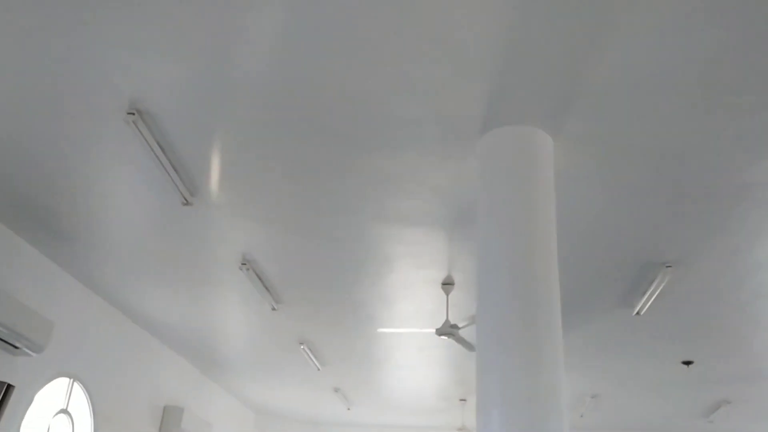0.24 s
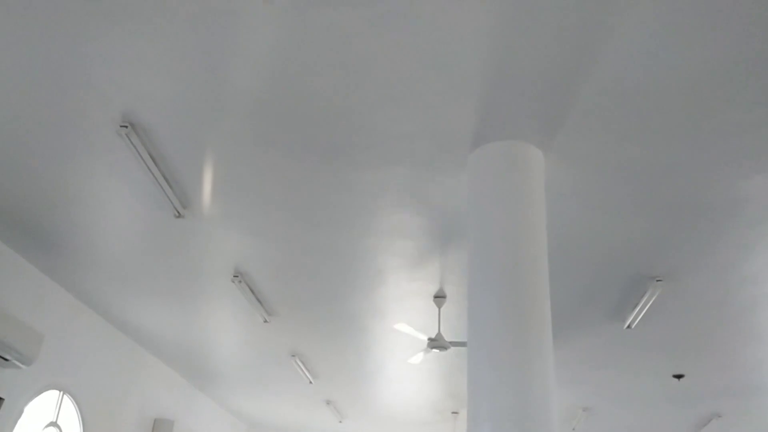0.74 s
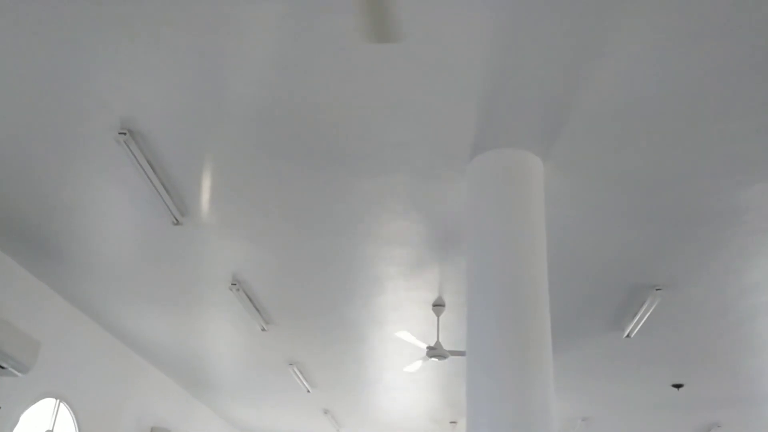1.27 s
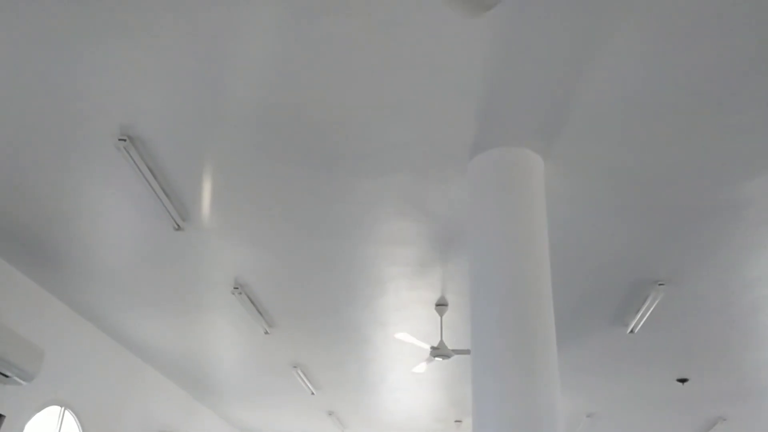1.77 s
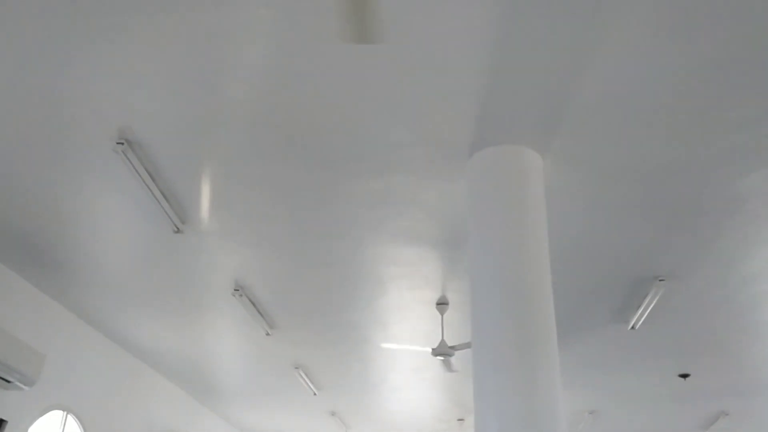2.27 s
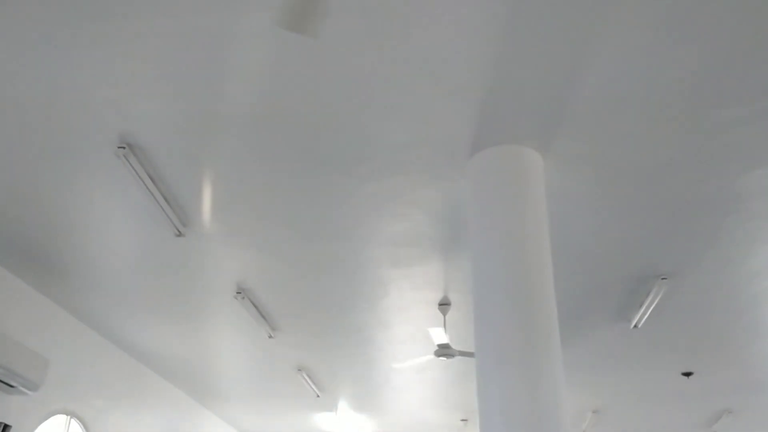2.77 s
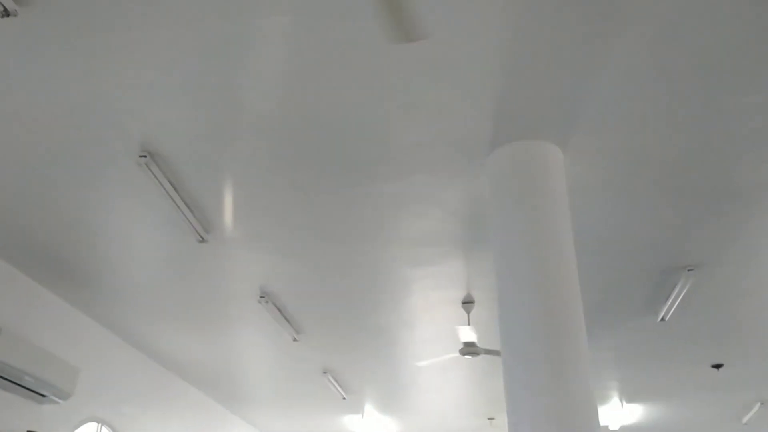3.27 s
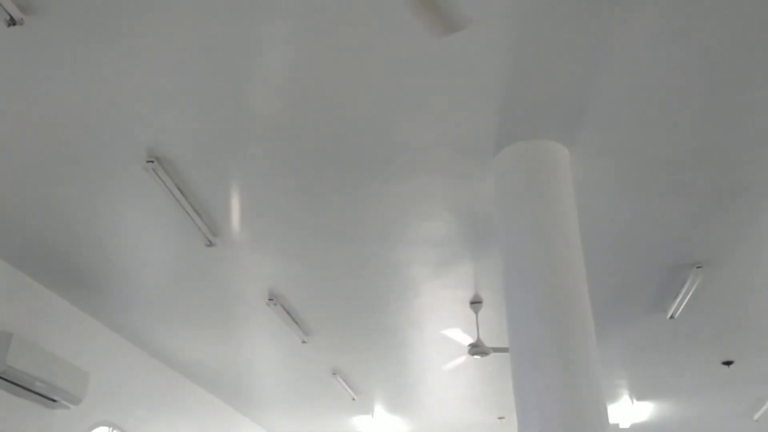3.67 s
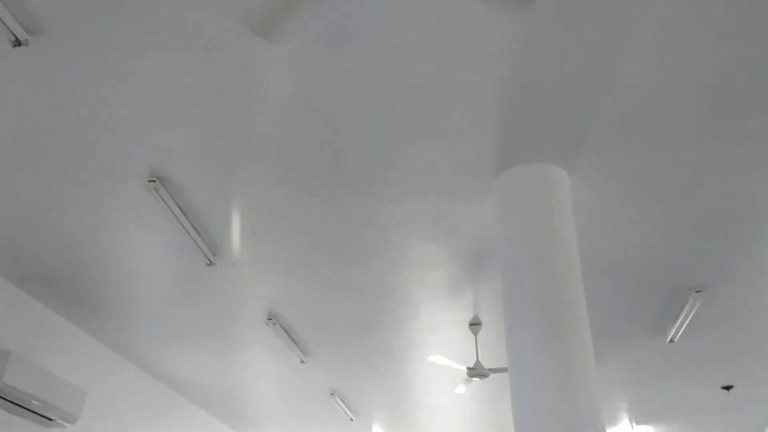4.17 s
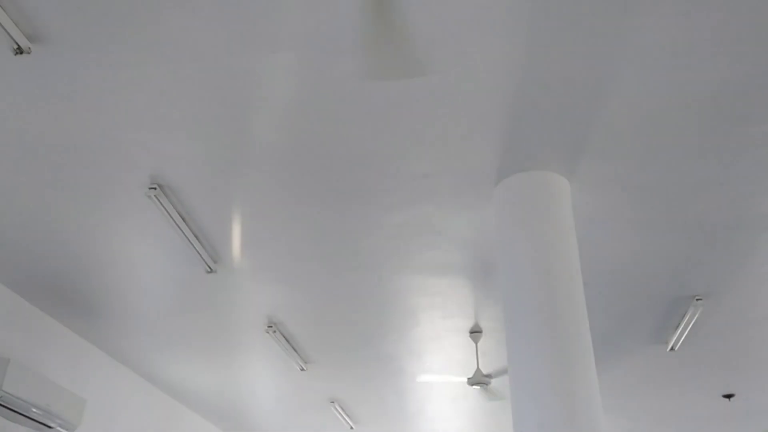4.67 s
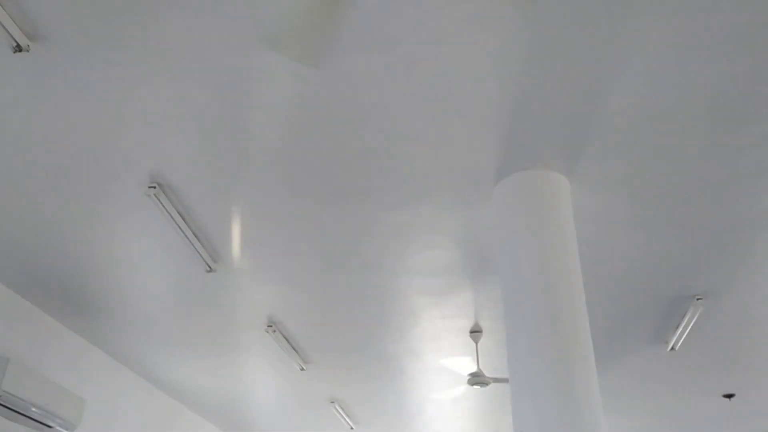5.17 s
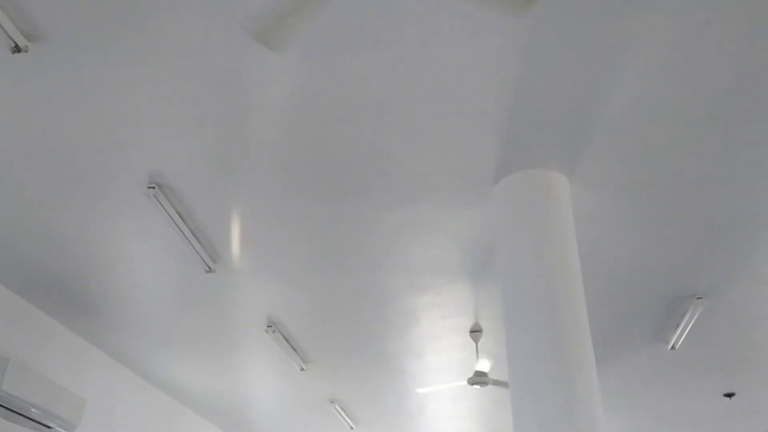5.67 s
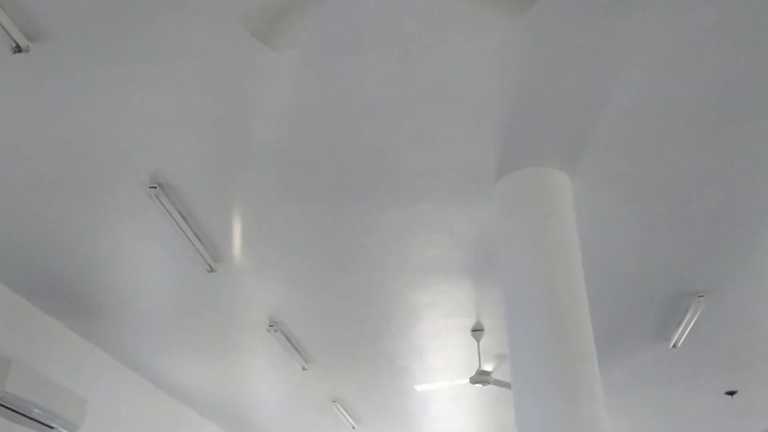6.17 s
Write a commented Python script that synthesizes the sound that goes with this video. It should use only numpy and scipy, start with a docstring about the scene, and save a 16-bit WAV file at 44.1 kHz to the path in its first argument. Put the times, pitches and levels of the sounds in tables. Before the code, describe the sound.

Sharp, hard clicks crack out close by at uneven intervals, each ringing briefly through a bare hall while ceiling fans rush softly and gradually louder.

```python
"""Sharp clicks of a small hard object close by stand out from the growing rush of ceiling fans in a bare hall.
Each click is a gritty contact that rings a shell and a hollow body; a surface nearby, the ceiling and the
far wall answer, and the hall rings on. Two short noise bursts tick faintly, and fluttering tones squeak far
away. Shaped noise makes the fans' rumble and rush, their wavering motor hum, a low hum and a thin hiss.
A microphone with two ports, left and right, picks it all up."""
import sys
import numpy as np
from scipy import signal
from scipy.fft import rfft, irfft, next_fast_len
from scipy.io import wavfile
from scipy.ndimage import uniform_filter1d, map_coordinates

SR = 44100
rng = np.random.default_rng(int(sys.argv[2]) if len(sys.argv) > 2 else 0)


def to_wav(sig):
    """Store sig (one row per channel, or 1-D mono) as 16-bit WAV at the path in sys.argv[1].

    Samples outside -1..1 are clipped; the rate is SR.
    """
    pcm = np.clip(np.atleast_2d(sig), -1, 1) * 32767
    pcm = np.round(pcm).astype(np.int16)
    wavfile.write(sys.argv[1], SR, pcm.T)  # frames by channels


N = 283122  # length of the scene in samples


def amp(db):
    """Turns a level in dB into a gain."""
    return 10 ** (np.asarray(db) / 20)


def unit(x):
    """Scales x to an average strength (rms) of 1."""
    return x / np.sqrt(np.mean(x ** 2) + 1e-20)


def along(points, hz, axis=1):
    """Reads one column of a table between its rows, on a logarithmic frequency axis."""
    columns = np.transpose(points)
    return np.interp(np.log(hz + 1), np.log(columns[0] + 1), columns[axis])


def wobble(rate):
    """A smooth random curve through `rate` random points a second."""
    knots = rng.standard_normal(int(N * rate / SR) + 4)
    return map_coordinates(knots, [np.arange(N) * rate / SR])


def filtered(x, response):
    """Shapes x by a (possibly complex) response to each frequency."""
    n = x.shape[-1]
    padded = next_fast_len(n + 8192)
    spectrum = rfft(x, padded) * response(np.fft.rfftfreq(padded, 1 / SR))
    return irfft(spectrum, padded)[..., :n]


def modes(table, f):
    """Resonances that ring after a blow; rows are (frequency [Hz], width [Hz], level [dB]), signs alternate."""
    return sum((-1) ** k * amp(db) * 1j * f * width / (centre ** 2 - f * f + 1j * f * width)
               for k, (centre, width, db) in enumerate(table))


def bumps(table, f):
    """Smooth bell-shaped bands added up; rows are (frequency [Hz], width [Hz], level [dB])."""
    return sum(amp(db) * np.exp(-((f - centre) / width) ** 2) for centre, width, db in table)


def add(out, s, x):
    """Mixes x into out at s seconds; what falls outside is lost."""
    start = round(s * SR)
    x = x[:, max(-start, 0):N - start]
    out[:, max(start, 0):max(start, 0) + x.shape[1]] += x


def burst(shape, evenness):
    """Two bursts of noise under an envelope, energy 1; evenness 0-1 flattens chance peaks in the spectrum."""
    z = rfft(rng.standard_normal((2, len(shape))) * shape)
    size = np.abs(z)
    even = z / (size + .2 * size.mean()) ** np.clip(evenness, 0, 1)
    x = irfft(even, len(shape)) * np.sqrt(shape)
    return x / np.linalg.norm(x, axis=1, keepdims=True)


def ports(hz):
    """Gains of the two microphone ports for diffuse sound; a cavity resonance favours the left one."""
    # (frequency [Hz], left minus right [dB])
    lean = [(60, 3), (110, 0.5), (200, 1.0), (380, 0.5), (700, 0), (1290, 2), (2380, 9), (4400, 1.5),
            (8120, 2.5), (15000, 1)]
    return amp(np.outer([.5, -.5], along(lean, hz)))


def diffuse(gain, patchy_db):
    """Noise from all around, rms 1, with random patches in pitch and time; the ports share the bass most."""
    # how alike left and right are: (frequency [Hz], likeness [0-1])
    alike = [(30, .85), (60, .9), (130, .95), (290, .9), (640, .72), (1410, .34), (3100, .03), (15000, 0)]
    air_lag = 4 / SR  # seconds by which the left port hears the air later
    z = signal.stft(rng.standard_normal((2, N)), nperseg=512)[2]
    field = uniform_filter1d(rng.standard_normal(z.shape[1:]), size=6, axis=0)
    field = uniform_filter1d(field, size=12, axis=1)
    pair = signal.istft(z * amp(patchy_db * unit(field)), nperseg=512)[1][:, :N]

    def split(hz):
        turn = np.arccos(np.clip(along(alike, hz), -1, 1)) / 2
        return gain(hz) * [np.cos(turn), np.sin(turn)]

    def late(hz):
        return ports(hz) * np.exp(-2j * np.pi * np.outer([air_lag, 0], hz))

    mid, side = filtered(pair, split)
    return unit(filtered(np.array([mid + side, mid - side]), late))


def hall():
    """Reverberation of energy 1 a port: quick scatter from near walls, then a build-up as the far wall answers."""
    # (frequency [Hz], time to fade by 60 dB [s], starting level [dB])
    fading = [(500, .8, -9.5), (1200, 0.57, 1.5), (2310, 1.9, -3.5), (3360, 1.2, 3.5), (4820, 1.49, -2),
              (6310, 0.83, -7), (7200, 1.1, 0), (9000, 0.91, -1.5), (11800, 0.31, 10.5),
              (11300, 0.25, -3.5), (15000, 0.54, -4)]
    far_wall_s, far_wall_gain = 0.11, .3  # when the far wall's answer peaks, and how far it stands out
    hz, t, z = signal.stft(rng.standard_normal((2, 5 * SR // 4)), SR, nperseg=256)
    level_db = along(fading, hz, axis=2)[:, None] - 60 * t / along(fading, hz)[:, None]
    tail = signal.istft(z * amp(level_db), SR, nperseg=256)[1]
    t = np.arange(tail.shape[1]) / SR
    near = 3 * np.exp(-t / 0.034) * np.clip((t - .007) / 0.001, 0, 1)
    far = np.clip(t / far_wall_s, 0, 1) ** 2 + far_wall_gain * np.exp(-((t - far_wall_s) / 0.022) ** 2)
    tail = filtered(tail * (near + far), ports)
    return tail / np.linalg.norm(tail) * np.sqrt(2)


def clicks():
    """A short gritty contact rings the thin shell and the hollow body; the right port hears it first."""
    # one row a click: (time [s], strength [dB], direct path [dB], contact scale [ms], ring [Hz], ring [dB],
    # tilt [dB per octave], body [dB], thump [dB], left minus right [dB])
    strikes = [(-.03, 11, 1.5, .52, 8000, -2, -0.5, 3.5, 13, 5),
               (0.5964, 11.5, -6.5, 1.83, 8130, 6, 1.3, 2.5, 4, -2),
               (1.064, 12.5, -2, 0.82, 7350, 8.5, 0, 1.5, 10, -2.5),
               (1.9847, 14, -3, 0.74, 6200, -1.5, -.3, 6.5, 13, -2.5),
               (3.986, 13, -3.5, 0.63, 5750, -3.5, 3.5, 6.5, 7, 0.1),
               (4.5609, 11.5, -1.5, 0.81, 7200, 10, 5.8, 4, 3, 2.5),
               (6.33, 14.5, -3, 1, 5160, 5, 0.5, 4.5, 7.5, 1)]
    # resonances of the thin shell: (frequency [Hz], width [Hz], level before the tilt [dB])
    shell_modes = [(4060, 1900, -6.5), (5260, 610, -1), (6200, 2700, -4.5), (7650, 1200, -1),
                   (8850, 960, 1.5), (10160, 3200, -6), (13040, 4500, -14.5)]
    # resonances of the hollow body: (frequency [Hz], width [Hz], level before the body column [dB])
    body_modes = [(1108, 160, -10), (1730, 430, -17), (2036, 180, -9.5), (2300, 180, -3.5),
                  (2602, 360, -3.5), (2815, 640, -15)]
    # the surface under the object: (frequency [Hz], width [Hz], level before the thump column [dB])
    thump_modes = [(462.5, 160, -21.5), (794, 240, -20)]
    # reflections: (delay after the contact's peak [ms], spread before the contact adds to it [ms],
    # left [dB], right [dB]), the levels before walls_db
    mirrors = [(1.727, 0.96, -13.5, -13), (5, 0.76, -12, -9), (7.1, 3.5, -21.5, -28),
               (13.9, 0.86, -31, -28.5), (23.7, 2.1, -25, -31), (30.82, 2.2, -24, -41.5)]
    # ringing of the left port under direct sound: (frequency [Hz], width [Hz], level [dB])
    cavity = [(2180, 200, 0.5)]
    # what the direct path favours over the room: (frequency [Hz], width [Hz], level [dB])
    beam = [(4302, 1100, -3), (7800, 330, 7), (13000, 6700, 4)]
    lag, body_late = 7.5 / SR, .0008  # seconds: left port's delay; until the blow reaches the body
    tilt_hz, ring_width_hz = 7000, 580  # pitch the colour tilts about; width of the strongest ringing band
    walls_db, hall_db = 5.5, -8.5  # reflections and reverberation against the strength of a click
    room_ring_db = -6  # the ringing band points at the microphone, so the room gets less of it
    out, ms = np.zeros((2, N)), np.arange(4096) / SR * 1000

    def edges(f, low_hz):
        # a small object radiates little bass, and the contact is too soft for the highest treble
        return 1 / np.sqrt((1 + (low_hz / (f + 1)) ** 6) * (1 + (f / 13600) ** 6))

    for s, db, direct_db, contact_ms, ring_hz, ring_db, tilt_db, body_db, thump_db, pan_db in strikes:
        shell = [(c, w, g + tilt_db * np.log2(c / tilt_hz)) for c, w, g in shell_modes]

        def thin(f, aim_db):
            # where the shell is struck decides which band rings most
            ringing = 1 + modes([(ring_hz, ring_width_hz, ring_db + aim_db)], f)
            return amp(db) * modes(shell, f) * ringing * edges(f, low_hz=3330)

        def hollow(f):
            sounding = amp(body_db) * modes(body_modes, f) + amp(thump_db) * modes(thump_modes, f)
            return amp(db) * edges(f, low_hz=344) * np.exp(-2j * np.pi * f * body_late) * sounding

        def room_colour(f):
            return thin(f, room_ring_db) + hollow(f)

        def ahead(f):
            pan = amp([[pan_db / 2], [-pan_db / 2]])
            delay = np.exp(-2j * np.pi * f * np.array([[lag], [0]]))
            return pan * delay * (1 + np.outer([1, 0], modes(cavity, f))) * (1 + bumps(beam, f))

        u = ms / contact_ms
        grit = burst(u * np.exp(-u * u), evenness=0.98)[0]
        # the heavy body feels the contact as one blow
        push = 1. * (np.arange(len(u)) == np.argmax(u > .5))
        direct = amp(direct_db) * (filtered(grit, lambda f: thin(f, 0)) + filtered(push, hollow))
        add(out, s, filtered(np.array([direct, direct]), ahead))

        # rough surfaces smear each reflection, differently at each port
        after_ms = ms - contact_ms / np.sqrt(2)
        mirrored = 0
        for at, spread, left, right in mirrors:
            smear = np.exp(-((after_ms - at) / (spread + .5 * contact_ms)) ** 2)
            mirrored = mirrored + amp([[left], [right]]) * burst(smear, evenness=0.5)
        add(out, s, amp(walls_db) * filtered(filtered(mirrored, ports), room_colour))
        add(out, s, amp(hall_db) * filtered(hall(), room_colour))
    return out


def ticks():
    """Tiny bursts of treble, the same at both ports, too weak to stir the hall."""
    # (time [s], level [dB], length scale [ms], frequency [Hz], width [Hz])
    taps = [(1.0003, -29, 1.4, 8450, 6000), (2.822, -23, 3.2, 9000, 1400)]
    out, ms = np.zeros((2, N)), np.arange(1024) / SR * 1000
    for s, db, length_ms, hz, width_hz in taps:
        u = ms / length_ms
        grit = burst(u * np.exp(-u * u), evenness=.7)[[0, 0]]
        add(out, s, amp(db) * filtered(grit, lambda f: modes([(hz, width_hz, 0)], f) ** 2))
    return out


def squeaks():
    """Stick-slip squeaks, fluttering in pitch and level, with overtones that die first."""
    # (time [s], length [s], frequency [Hz], level before fading and the final gains [dB])
    cries = [(2.864, .12, 2180, -65), (2.879, 0.16, 2310, -70), (3.356, .075, 2296, -53.5),
             (3.45, 0.11, 2300, -59.5)]
    overtone_s = .02  # time constant of the overtones' fading
    dry, t = np.zeros((1, N)), np.arange(SR // 4) / SR
    for s, length, hz, db in cries:
        waver, flutter = unit(uniform_filter1d(rng.standard_normal((2, len(t))), size=300, axis=1))
        turn = 2 * np.pi * np.cumsum(hz * (1 + .003 * waver)) / SR
        overtones = amp(-29.0) * np.sin(2 * turn) + amp(-16.5) * np.sin(4 * turn)
        tone = np.sin(turn) + np.exp(-t / overtone_s) * overtones
        # nearly flat over its length; rounding leaves a remnant about 31 dB weaker after that
        envelope = np.abs(np.sin(np.pi * np.clip(t / length, 0, 1))) ** 0.097
        add(dry, s, amp(db + 1.5 * flutter - 40 * t) * tone[None] * envelope)
    ringing = signal.fftconvolve(dry, hall(), axes=1)[:, :N]
    return amp(2.0) * ringing + amp(5.5) * filtered(dry, ports)


def fans():
    """Stirred air rumbles and rushes more and more; motors hum in narrow, unsteady bands over a steady low hum."""
    # colour of the rumble: (frequency [Hz], relative level [dB])
    rumble = [(12, -48), (20, -5.5), (53, -17.5), (70, -16), (92, -12), (139, -11), (195, -3), (223, -6.5),
              (265, -4.5), (449, -13), (500, -15), (650, -57.5), (1100, -120)]
    # colour of the rush: (frequency [Hz], relative level [dB])
    rush = [(150, -10.5), (250, -13.5), (363, -13), (443, -18.5), (548, -2.5), (795, -6), (920, -4.5),
            (1250, -10), (1390, -9.5), (1700, -14.5), (2240, -12), (3130, -29.5), (4920, -35), (6000, -49),
            (7800, -71.5), (13200, -120)]
    # bands of the motor hum: (frequency [Hz], width [Hz], relative level [dB])
    hum = [(202.8, 7.7, 1), (545, 7.7, -11)]
    # motor hum before its wavering: (time [s], level [dB])
    motor_level = [(0, -70), (2.5, -64), (3.5, -65), (3.9, -57.5), (4.6, -64), (6.42, -60.5)]
    # bands of the steady low hum: (frequency [Hz], width [Hz], relative level [dB])
    low_hum = [(46, 9.9, 0.5), (96, 10, -2.5)]
    rumble_db, rumble_db_per_s = -57, 0.54  # level at the start before the swirl, and its growth
    rush_db, rush_db_per_s = -58.5, 1.55
    t = np.arange(N) / SR
    swirl = wobble(0.84)  # slow unsteadiness shared by rumble and rush
    low_db = rumble_db + rumble_db_per_s * t + .6 * swirl
    low = amp(low_db) * diffuse(lambda hz: amp(along(rumble, hz)), patchy_db=-0.15)
    mid_db = rush_db + rush_db_per_s * t + 0.21 * swirl + 0.87 * wobble(6.1)
    mid = amp(mid_db) * diffuse(lambda hz: amp(along(rush, hz)), patchy_db=0.92)
    hum_db = np.interp(t, *np.transpose(motor_level)) + 1.5 * wobble(5.2)
    motor = amp(hum_db) * diffuse(lambda hz: bumps(hum, hz), patchy_db=0)
    steady = amp(-63.5) * diffuse(lambda hz: bumps(low_hum, hz), patchy_db=0)
    return low + mid + motor + steady


def treble():
    """A thin hiss at a constant level, made of patchy noise, with faint swells around 9 kHz."""
    # colour of the hiss: (frequency [Hz], relative level [dB])
    hiss = [(1760, -9.5), (3000, 4), (3560, -1.5), (4100, 3.5), (5080, -18.5), (5410, -0.5), (6940, 0),
            (10200, 3), (11300, -6), (14900, -7.5), (16400, -41)]
    # swells of the high treble: (time [s], half length [s], level [dB])
    sheen = [(2.883, .2, -69), (3.358, .08, -72), (3.783, .22, -69.5), (5.62, 0.18, -70), (6.202, 0.2, -70)]
    t = np.arange(N) / SR
    steady = amp(-71) * diffuse(lambda hz: amp(along(hiss, hz)), patchy_db=4.0)
    swell = diffuse(lambda hz: np.exp(-((hz - 9000) / 2400) ** 2), patchy_db=1)
    swell_gain = sum(amp(db) * np.exp(-((t - s) / half) ** 4) for s, half, db in sheen)
    return steady + swell * swell_gain


def scene():
    """All sources added up at the microphone."""
    return clicks() + ticks() + squeaks() + fans() + treble()


def record(dry):
    """The loudest peaks are rounded off, and nothing is kept above the band limit."""
    top_hz = 16575
    held = dry / (1 + np.abs(dry / .82) ** 4) ** (1 / 4)
    return filtered(held, lambda hz: np.clip((top_hz - hz) / 1200, 0, 1) ** 1.5)


dry = scene()
out = record(dry)
to_wav(out)
```